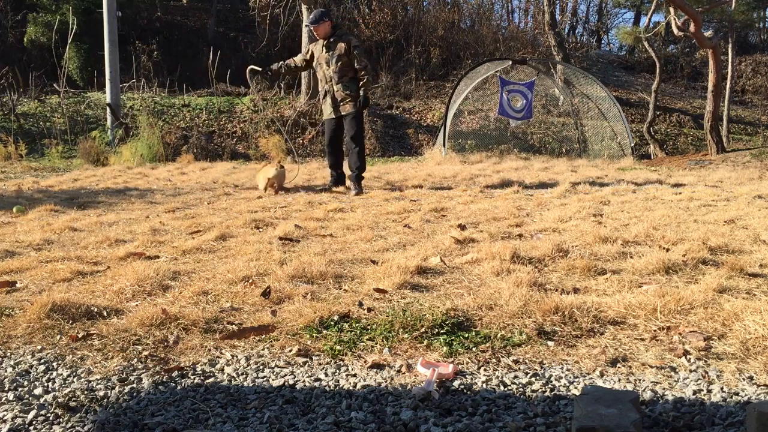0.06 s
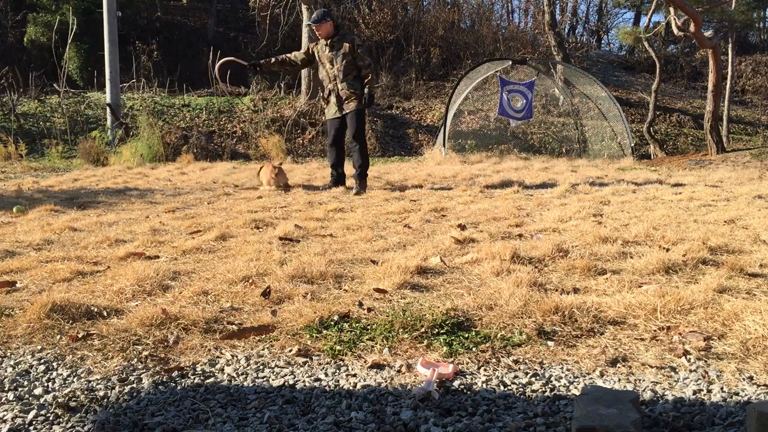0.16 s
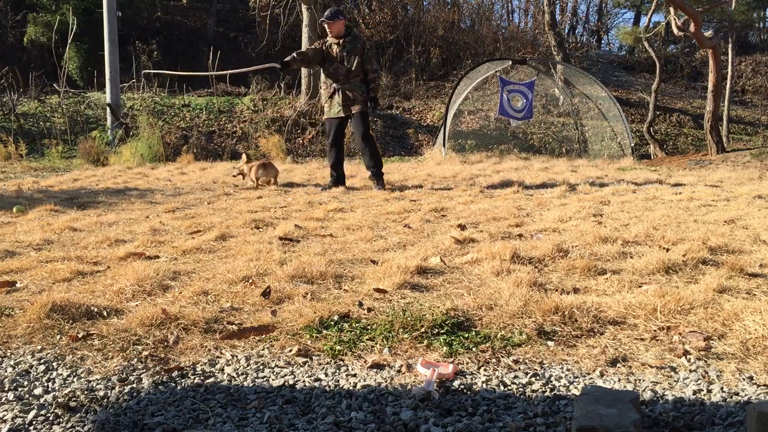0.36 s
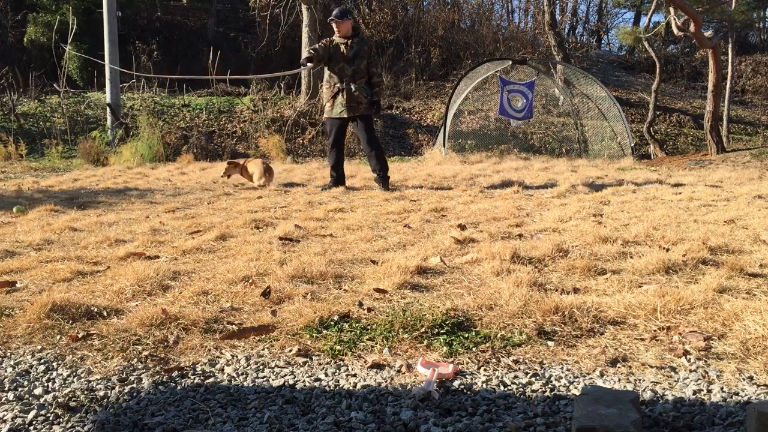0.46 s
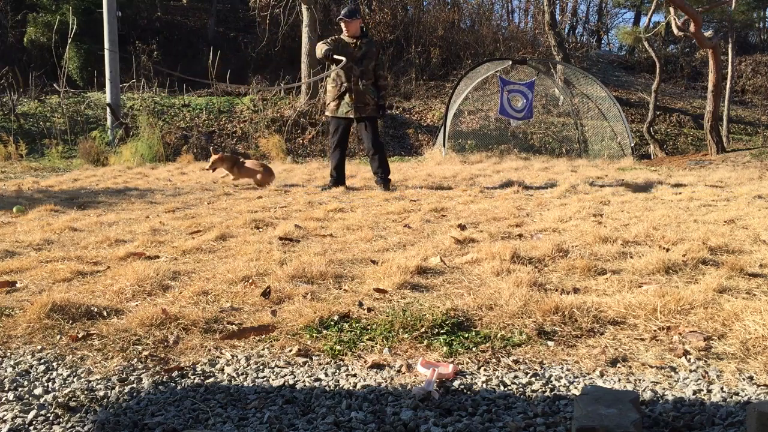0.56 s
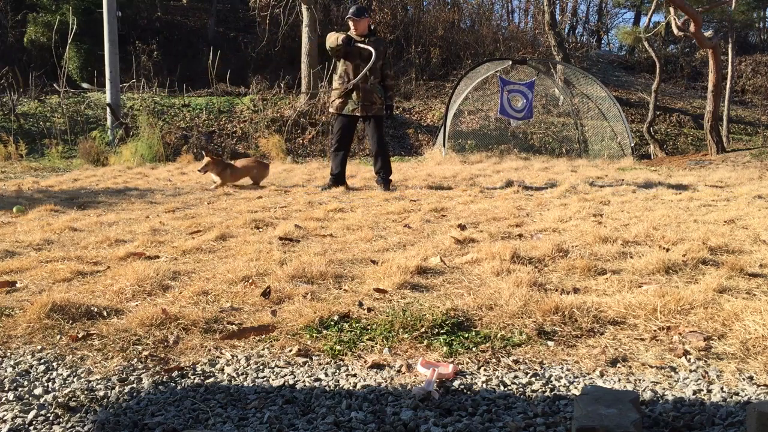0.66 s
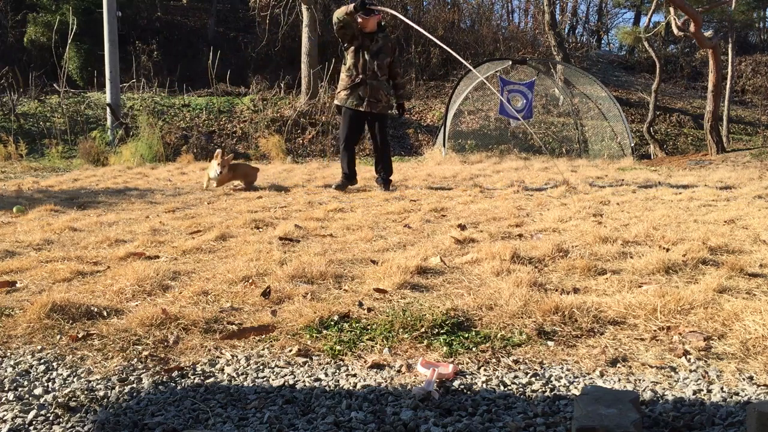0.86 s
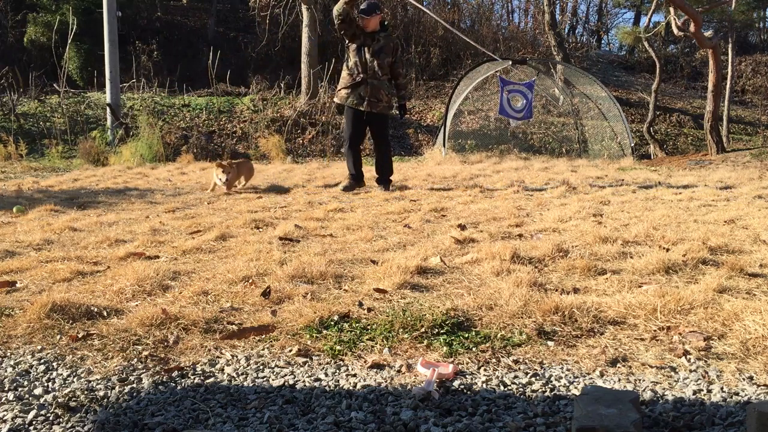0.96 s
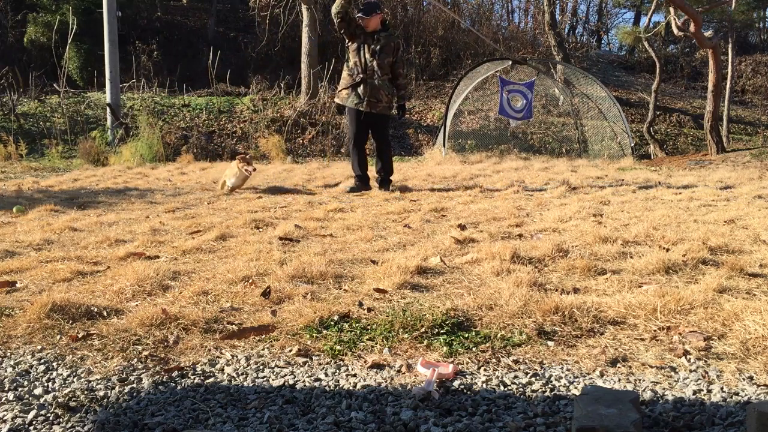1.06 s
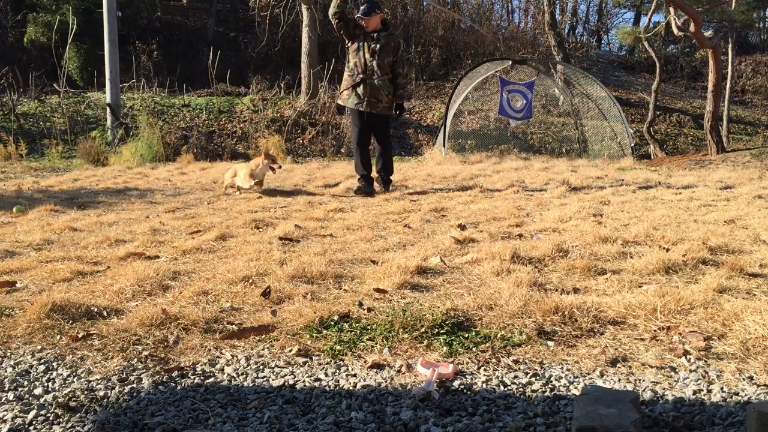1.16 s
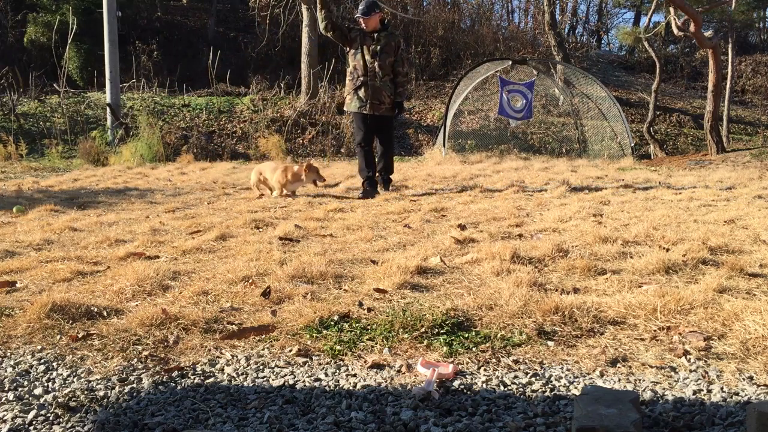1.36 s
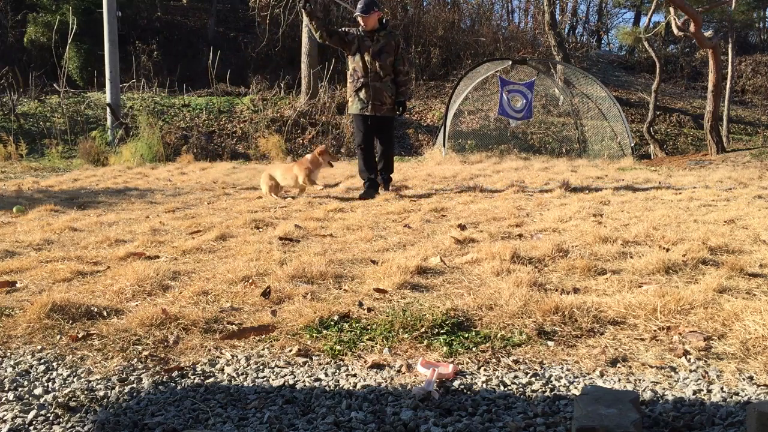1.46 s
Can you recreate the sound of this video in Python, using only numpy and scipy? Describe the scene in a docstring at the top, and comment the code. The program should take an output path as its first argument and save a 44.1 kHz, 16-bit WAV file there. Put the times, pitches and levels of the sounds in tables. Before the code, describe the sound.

On a dry lawn, a quick rising swish ends in a single bright whip crack that dies away fast. Afterwards the microphone picks up soft shuffling steps, tiny stalk snaps and quiet outdoor rumble and hiss.

```python
"""A dry lawn, with steady outdoor rumble and hiss. A bullwhip is swung: the thong speeds up and
swishes ever louder, then its tip cracks. The shock bounces off the ground; ground and trees
scatter it into a short tail. Around the crack and after it, feet and thong thud and scuff
on the turf, dry grass rustles faintly and a few stalks snap."""
import sys
import numpy as np
from scipy import signal
from scipy.fft import rfft, irfft, next_fast_len
from scipy.io import wavfile
from scipy.ndimage import map_coordinates

SR = 44100
rng = np.random.default_rng(int(sys.argv[2]) if len(sys.argv) > 2 else 0)


def dump(signal):
    """Clip the signal to [-1, 1] and save it as 16-bit WAV at the path in sys.argv[1]."""
    limited = np.clip(np.atleast_2d(signal).T, -1, 1)
    pcm = np.round(limited * 32767).astype(np.int16)
    wavfile.write(sys.argv[1], SR, pcm)


N = 66150

# Background spectra. Each row: frequency in Hz, gain in dB.
RUMBLE_SPECTRUM = [(20, -16.5), (35, -25), (55, 3.5), (80, -0.5), (120, -7), (200, -7.5), (290, -10),
                   (400, -25.5), (1000, -59.5), (4000, -94.5)]
HISS_SPECTRUM = [(100, 10), (400, 5.5), (520, 2), (610, 6.5), (750, 1.5), (950, 1), (1300, 1.5),
                 (2500, -0.5), (5000, -4.5), (8000, -6.5), (10500, -7), (16500, -7)]
# Hiss drift. Each row: time in seconds, gain in dB.
HISS_DRIFT = [(0, 2), (.5, -0.5), (.8, 0), (1.1, .5), (1.22, 0), (1.3, 0.5), (1.5, -1)]
RUMBLE_DB, HISS_DB = -66, -66.5

# Grass rustles. Each row: centre in seconds, half length in seconds, level in dB, tilt in dB/octave.
GRASS_RUSTLES = [(.06, 0.0354, -63.5, 3), (0.578, 0.0146, -61.5, 7), (0.632, 0.0625, -64, 9),
                 (0.733, .02, -64, -0.5), (0.811, 0.0168, -65.5, 2.5), (0.968, 0.0159, -59, 3.48),
                 (1.06, 0.073, -69, 6), (1.179, 0.0122, -64.5, 0.5), (1.279, 0.023, -65, 0.85)]
# Snapping stalks. Each row: start in seconds, level in dB.
STALK_SNAPS = [(0.8378, -50.5), (.872, -49), (1.162, -54), (1.1677, -51.5), (1.173, -50), (1.1774, -53.5)]
# Blade and stalk spectra. Each row: frequency in Hz, gain in dB.
RUSTLE_SPECTRUM = [(300, -15.5), (1200, 10.5), (3000, 4), (8000, -3), (11000, -1.5), (16000, -0.5)]
SNAP_SPECTRUM = [(2000, -19.5), (7000, -10.5), (11000, -6), (16000, -5.5)]
GRAIN_DB, SNAP_RISE_S, SNAP_T60_S = 2.5, 0.000112, 0.007

# Thuds of feet and thong. Each row: start in seconds, level in dB, pitch in Hz, T60 in seconds.
TURF_THUDS = [(0.089, -48, 89.5, 0.064), (0.135, -41, 153.8, 0.051), (0.187, -36.5, 140.4, 0.0399),
              (.572, -53.5, 65.4, 0.134), (.7165, -42, 601, 0.0195), (0.7158, -49, 333, 0.058),
              (.834, -49.5, 581.4, 0.0666), (.833, -49.5, 1707, 0.032), (0.835, -49, 77.6, 0.062),
              (0.878, -46.5, 195, 0.04), (0.876, -52.5, 1248, .04), (1.175, -36.5, 153.6, 0.0667),
              (1.175, -44.5, 496.5, 0.0377)]
# Scuffs on the turf. Each row: start in seconds, level in dB, band centre in Hz, T60 in seconds.
TURF_SCUFFS = [(0.714, -51.5, 482, 0.1305), (0.711, -64.5, 1423, 0.182), (.735, -59.5, 786, 0.092),
               (.833, -55, 1528, 0.041), (0.879, -60, 885, 0.0387), (0.944, -63.5, 556, 0.104),
               (1.163, -63, 1480, 0.053), (1.358, -66, 1134, 0.224), (1.382, -64.5, 570, 0.169)]
# Spectrum of shuffling feet. Each row: frequency in Hz, gain in dB.
SHUFFLE_SPECTRUM = [(60, -6.5), (140, -1), (280, -1.5), (400, -7), (580, -13), (1000, -17), (4000, -31.5)]
THUD_RISE_S, SCUFF_RISE_S, SCUFF_Q = 0.00243, 0.0016, 2.9
SHUFFLE_S, SHUFFLE_HALF_S, SHUFFLE_DB = 0.852, 0.0915, -63.5

# Tones of air shed by the thong.
# Each row: centre in seconds, half length in seconds, pitch in Hz, width in Hz, level in dB.
THONG_TONES = [(0.124, 0.0133, 629, 30, -59.5), (0.2163, 0.00275, 1099, 380.2, -43),
               (0.2166, 0.00328, 1801, 550.6, -45.5), (.22, 0.0039, 3446, 1200, -52),
               (.223, 0.0036, 1900, 600, -51.5), (0.232, 0.008, 1250, 350, -51.5),
               (0.457, 0.0277, 848.6, 510, -71)]
# Spectrum of the swishing thong. Each row: frequency in Hz, gain in dB.
THONG_SPECTRUM = [(200, 2.5), (600, -2), (1300, -0.5), (2200, -9.5), (4000, -17.5), (16000, -40)]
THONG_END_DB, THONG_DB_PER_S = -50, 119
TIP_END_DB, TIP_DB_PER_S = -49.5, 380

# Spectrum of the scattered bang, also used for the tip's hiss. Each row: frequency in Hz, gain in dB.
SCATTER_SPECTRUM = [(60, -12), (110, -0.5), (160, 0.5), (236, -5.5), (299, -3), (404, -13.5), (460, -6.5),
                    (540, -13), (710, -17), (800, -3), (1100, -4.5), (1470, -11.5), (1860, -9.5),
                    (2260, -6), (2570, -2), (2800, -8.5), (3620, -6.5), (4210, -7), (6460, -7.5),
                    (7680, -12.5), (8370, -6), (10400, -10.5), (11300, -9), (17000, -10.5)]
# Resonances in the scattered bang. Each row: pitch in Hz, width in Hz, relative level in dB.
SCATTER_RESONANCES = [(788.6, 20.15, 0.5), (1833.7, 18.9, -3.5), (2554.6, 16.23, 4), (2642, 20, -2),
                      (3089, 20, -0.5), (5053, 35, -4), (5100, 46, -10), (6373, 29.5, -17.5),
                      (7127, 38, 1.5), (8228, 49, -4.5)]
SCATTER_DB, SCATTER_RISE_S, SCATTER_HOLD_S, SCATTER_T60_S = -34, 0.0022, 0.01914, 0.1613
RING_DB, RING_T60_S = -41, 0.1093

# Direct shock and its fuller ground bounce.
# Each row: start in seconds, level in dB, T60 in seconds, tilt in dB/octave.
SHOCK_ARRIVALS = [(0.2394, -21.5, 0.0089, -1.16), (0.2403, -17, 0.0123, -1.2)]
# Shock spectrum before tilt. Each row: frequency in Hz, gain in dB.
SHOCK_SPECTRUM = [(100, -15), (400, -12.5), (841, -2.5), (1300, -22), (1740, 1), (3000, -9.5), (4090, -8),
                  (5150, 0.5), (5750, 0.5), (7070, 3.5), (8620, -9.5), (9830, 2), (11800, -3.5),
                  (13800, -2), (15600, 0), (16700, -6)]
CRACK_S, SHOCK_RISE_S, SHOCK_HOLD_S = 0.2395, 0.000112, 0.000314
THUMP_S, THUMP_HALF_S, THUMP_HZ, THUMP_DB = 0.2485, 0.00601, 174.3, -37.5

LOW_CUT_HZ, ROLLOFF_HZ, BAND_LIMIT_HZ = 34.7, 17350, 19400


def amp(db):
    """Decibels to gain."""
    return 10 ** (np.asarray(db) / 20)


def unit_rms(x):
    """Scale to rms 1."""
    return x / np.sqrt(np.mean(x ** 2) + 1e-20)


def since(start_s):
    """Seconds since start_s, per sample."""
    return np.arange(N) / SR - start_s


def spectrum(points, tilt_db_per_oct=0):
    """Response through (Hz, dB) points on a log axis, plus a tilt."""
    knots_hz, knots_db = np.transpose(points)

    def response(hz):
        db = np.interp(np.log(hz + 1), np.log(knots_hz + 1), knots_db)
        return amp(db + tilt_db_per_oct * np.log2(hz + 1))
    return response


def band(centre_hz, width_hz):
    """Response of two equal resonators in series, each width_hz wide."""
    return lambda hz: (1j * hz * width_hz / (centre_hz ** 2 - hz ** 2 + 1j * hz * width_hz)) ** 2


def filtered(x, response):
    """Apply a frequency response by padded FFT."""
    size = next_fast_len(N + SR // 2)
    return irfft(rfft(x, size) * response(np.fft.rfftfreq(size, 1 / SR)), size)[:N]


def noise(response, envelope=1):
    """White noise of rms 1, enveloped, then filtered with its power kept."""
    power = np.mean(abs(response(np.fft.rfftfreq(N, 1 / SR))) ** 2)
    return filtered(envelope * rng.standard_normal(N), response) / np.sqrt(power)


def wobble(knots_per_s):
    """Smooth random curve."""
    return map_coordinates(rng.standard_normal(N), [np.arange(N) * knots_per_s / SR])


def airy_tone(pitch_hz, width_hz):
    """Tone of rms 1 whose pitch wanders quickly over about width_hz."""
    hz = pitch_hz + width_hz * wobble(4 * width_hz) / 2
    return np.sqrt(2) * np.sin(2 * np.pi * np.cumsum(hz) / SR)


def burst(start_s, rise_s, t60_s, hold_s=0):
    """Linear attack; exponential decay begins hold_s after the start."""
    t = since(start_s)
    return np.clip(t / rise_s, 0, 1) * amp(-60 * np.maximum(t - hold_s, 0) / t60_s)


def swell(centre_s, half_s):
    """Gaussian envelope with sigma half_s."""
    return np.exp(-0.5 * (since(centre_s) / half_s) ** 2)


def background():
    """Steady outdoor rumble and slowly drifting hiss."""
    drift_db = np.interp(since(0), *np.transpose(HISS_DRIFT))
    rumble = amp(RUMBLE_DB) * noise(spectrum(RUMBLE_SPECTRUM))
    hiss = amp(HISS_DB + drift_db) * noise(spectrum(HISS_SPECTRUM))
    return rumble + hiss


def grass():
    """Dry blades brush in grainy swells; single stalks snap."""
    rustles = sum(amp(db) * swell(centre_s, half_s) * noise(spectrum(RUSTLE_SPECTRUM, tilt))
                  for centre_s, half_s, db, tilt in GRASS_RUSTLES)
    grain = unit_rms(amp(GRAIN_DB * wobble(knots_per_s=900)))
    snap_envelope = sum(amp(db) * burst(start_s, SNAP_RISE_S, SNAP_T60_S) for start_s, db in STALK_SNAPS)
    return rustles * grain + snap_envelope * noise(spectrum(SNAP_SPECTRUM))


def turf():
    """Feet and thong meet the ground: damped thuds, short scuffs, a dull shuffle."""
    thuds = sum(amp(db) * burst(start_s, THUD_RISE_S, t60_s) * np.sin(2 * np.pi * hz * since(start_s))
                for start_s, db, hz, t60_s in TURF_THUDS)
    scuffs = sum(amp(db) * burst(start_s, SCUFF_RISE_S, t60_s) * noise(band(hz, 2 * hz / SCUFF_Q))
                 for start_s, db, hz, t60_s in TURF_SCUFFS)
    shuffle = amp(SHUFFLE_DB) * swell(SHUFFLE_S, SHUFFLE_HALF_S) * noise(spectrum(SHUFFLE_SPECTRUM))
    return thuds + scuffs + shuffle


def swish():
    """Thong and tip speed up, shedding noise that grows until the crack; the thong adds brief tones."""
    t = since(CRACK_S)
    lead_s = np.minimum(t, 0)
    thong = amp(THONG_END_DB + THONG_DB_PER_S * lead_s) * noise(spectrum(THONG_SPECTRUM))
    tip = amp(TIP_END_DB + TIP_DB_PER_S * lead_s) * noise(spectrum(SCATTER_SPECTRUM))
    tones = sum(amp(db) * swell(centre_s, half_s) * airy_tone(pitch_hz, width_hz)
                for centre_s, half_s, pitch_hz, width_hz, db in THONG_TONES)
    return (thong + tip) * (t < 0) + tones


def scatter():
    """Ground and trees return the shock as dense reflections with brief resonances."""
    echoes = amp(SCATTER_DB) * noise(spectrum(SCATTER_SPECTRUM))
    tones = sum(amp(db) * airy_tone(hz, width_hz) for hz, width_hz, db in SCATTER_RESONANCES)
    ring = amp(RING_DB) * unit_rms(tones)
    echo_envelope = burst(CRACK_S, SCATTER_RISE_S, SCATTER_T60_S, SCATTER_HOLD_S)
    ring_envelope = burst(CRACK_S, SCATTER_RISE_S, RING_T60_S, SCATTER_HOLD_S)
    return echoes * echo_envelope + ring * ring_envelope


def crack():
    """The tip's shock and its ground bounce, each a few milliseconds long, then a low thump."""
    shocks = np.zeros(N)
    for start_s, db, t60_s, tilt in SHOCK_ARRIVALS:
        envelope = burst(start_s, SHOCK_RISE_S, t60_s, SHOCK_HOLD_S)
        shocks += amp(db) * noise(spectrum(SHOCK_SPECTRUM, tilt), envelope)
    thump = amp(THUMP_DB) * swell(THUMP_S, THUMP_HALF_S) * np.sin(2 * np.pi * THUMP_HZ * since(THUMP_S))
    return shocks + thump


def scene():
    """All sources at one microphone."""
    return (swish() + crack() + scatter() + turf() + grass() + background())[None]


def record(dry):
    """The recorder cuts deep bass and rolls off the treble steeply below its band limit."""
    def treble_cut(hz):
        return amp(-30 * np.clip((hz - ROLLOFF_HZ) / 400, 0, 1)) * (hz < BAND_LIMIT_HZ)

    low_cut = signal.butter(4, LOW_CUT_HZ, "highpass", fs=SR, output="sos")
    return filtered(signal.sosfilt(low_cut, dry[0]), treble_cut)[None]


dry = scene()
out = record(dry)
dump(out)
```